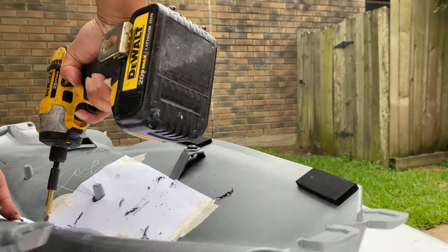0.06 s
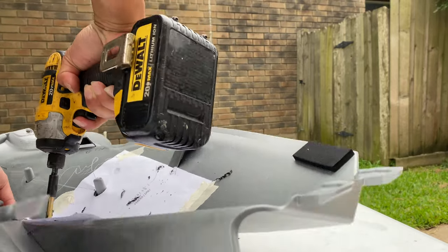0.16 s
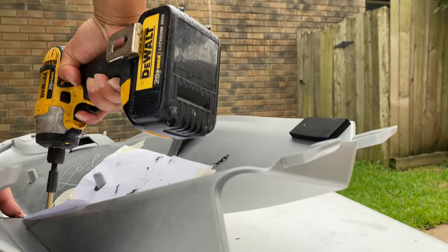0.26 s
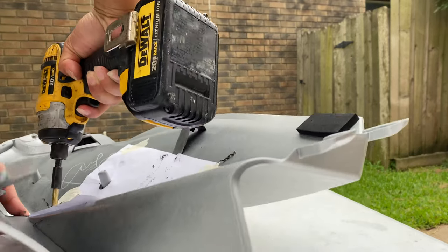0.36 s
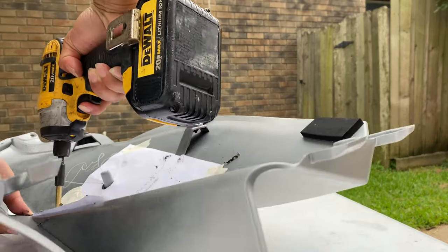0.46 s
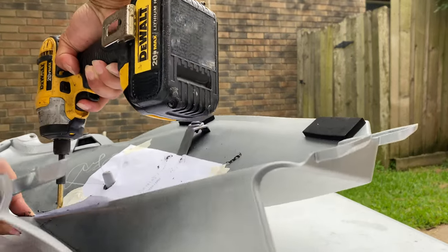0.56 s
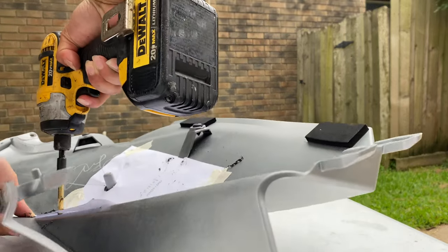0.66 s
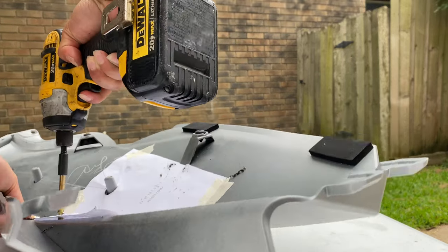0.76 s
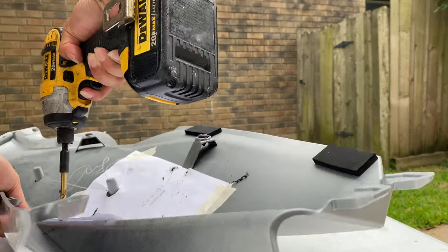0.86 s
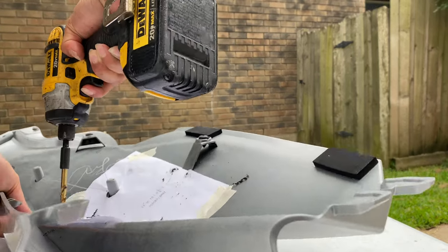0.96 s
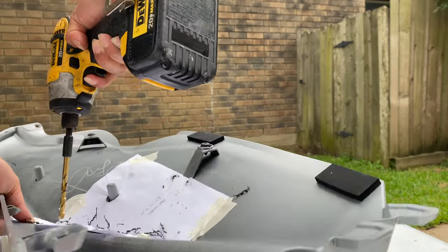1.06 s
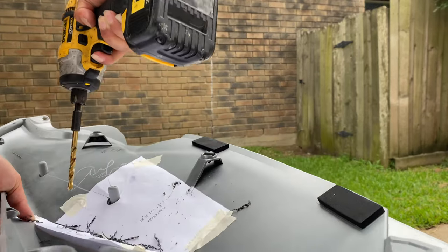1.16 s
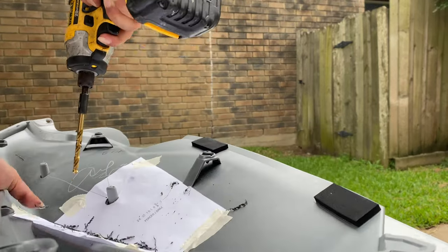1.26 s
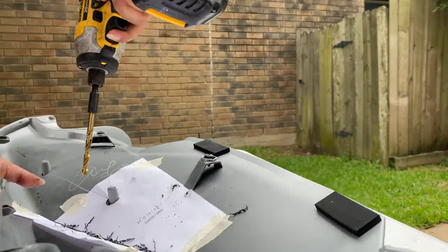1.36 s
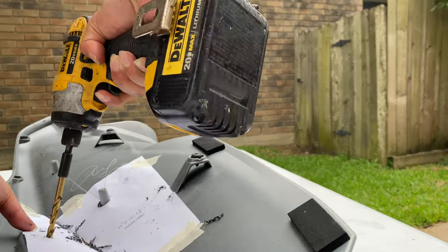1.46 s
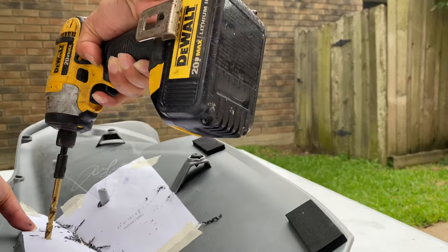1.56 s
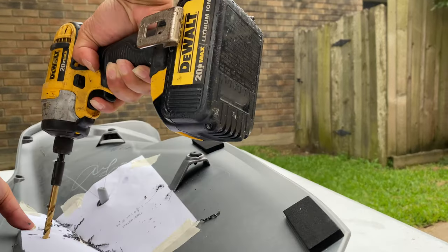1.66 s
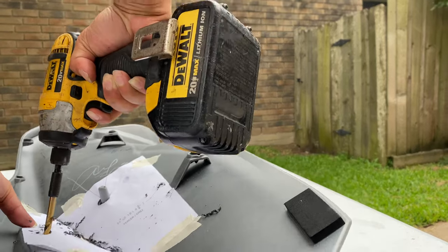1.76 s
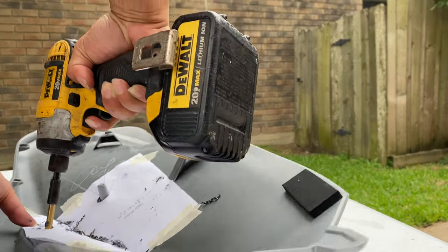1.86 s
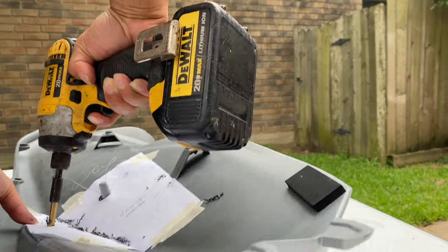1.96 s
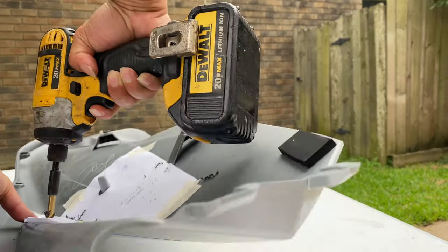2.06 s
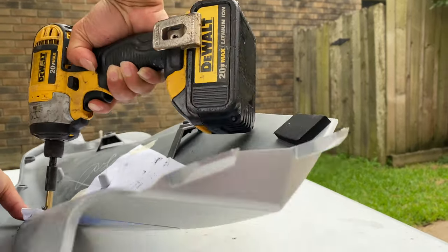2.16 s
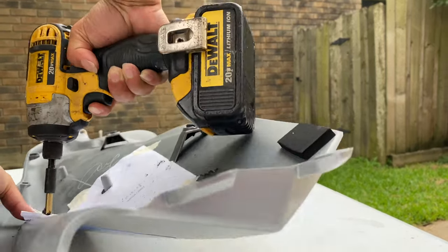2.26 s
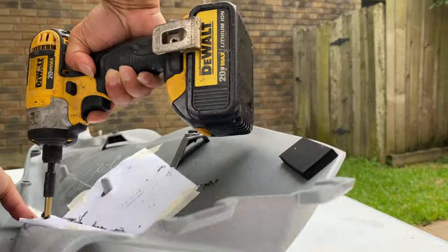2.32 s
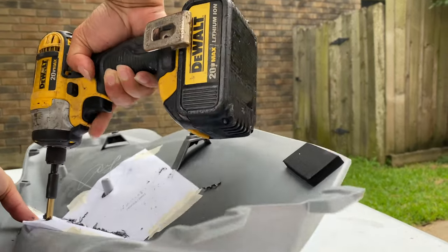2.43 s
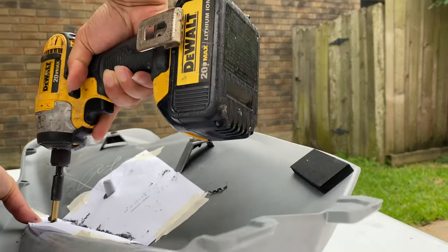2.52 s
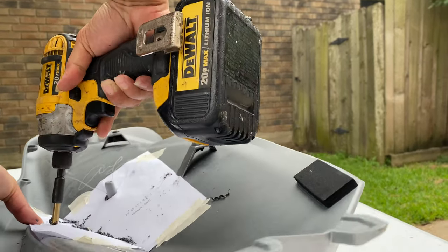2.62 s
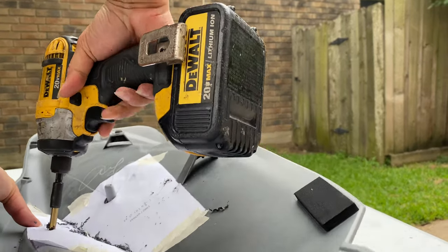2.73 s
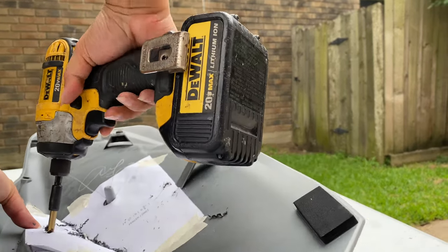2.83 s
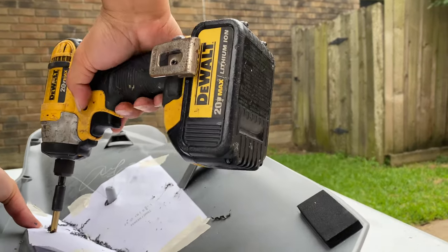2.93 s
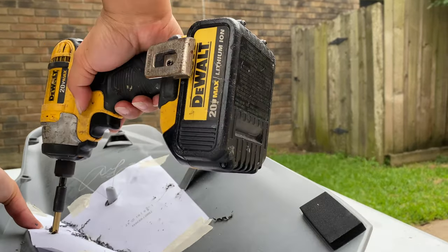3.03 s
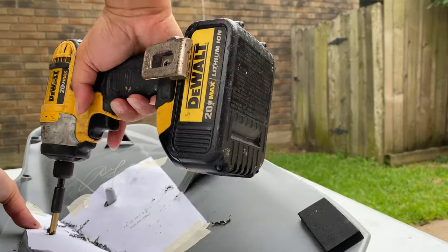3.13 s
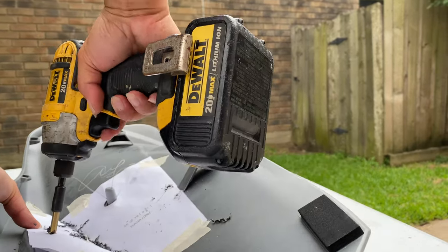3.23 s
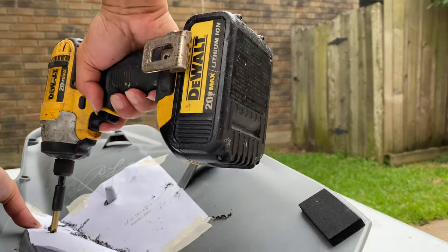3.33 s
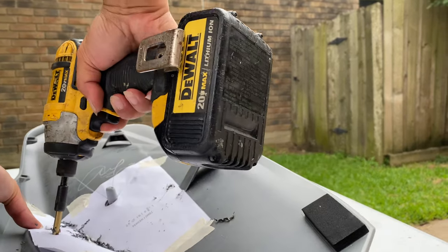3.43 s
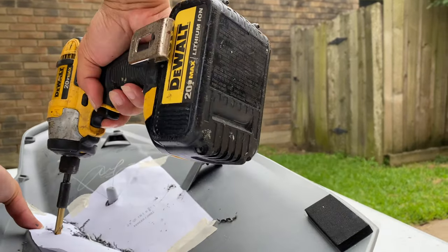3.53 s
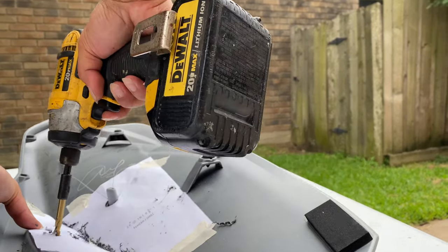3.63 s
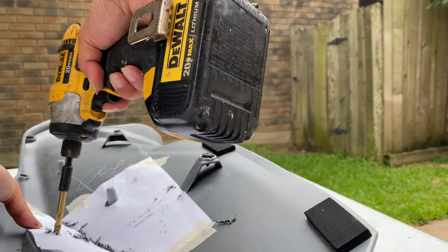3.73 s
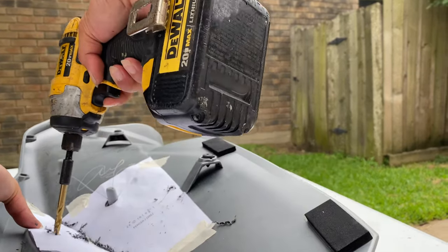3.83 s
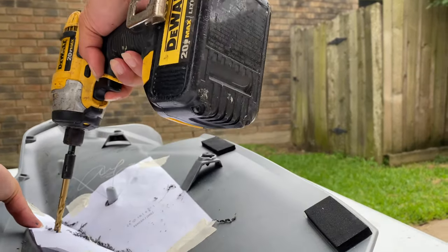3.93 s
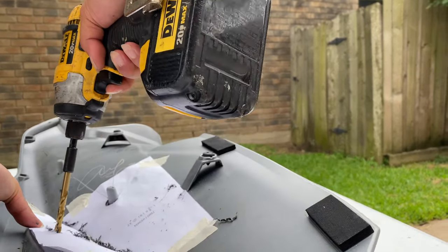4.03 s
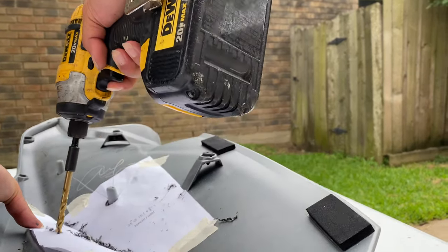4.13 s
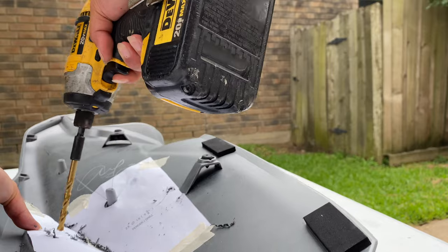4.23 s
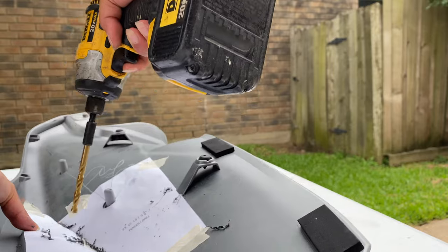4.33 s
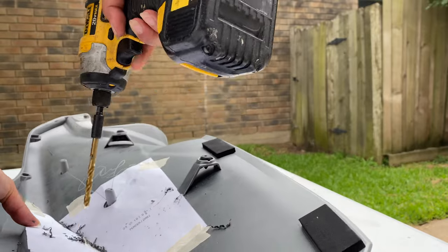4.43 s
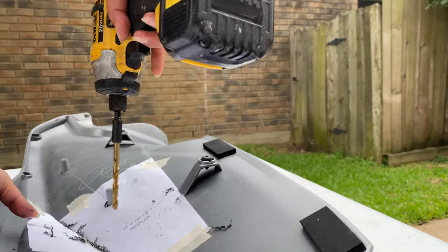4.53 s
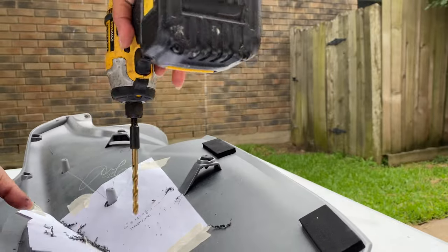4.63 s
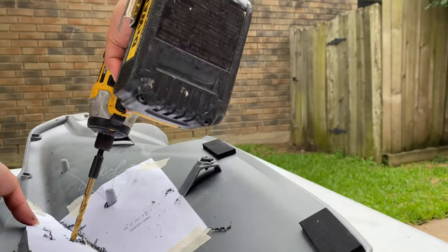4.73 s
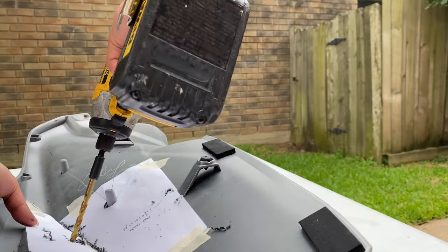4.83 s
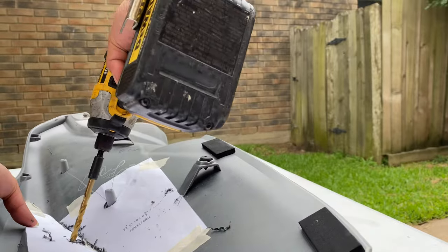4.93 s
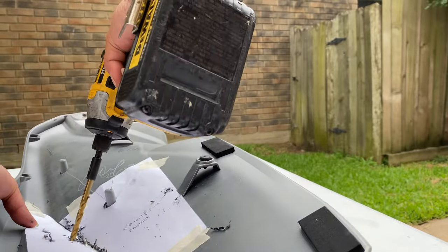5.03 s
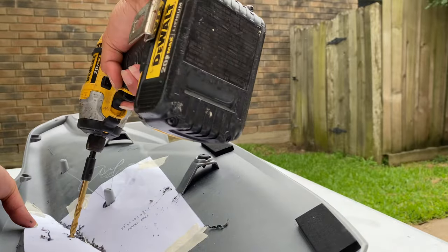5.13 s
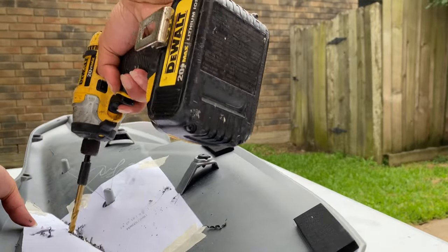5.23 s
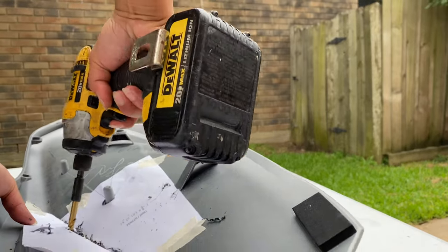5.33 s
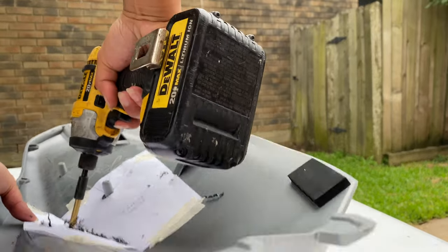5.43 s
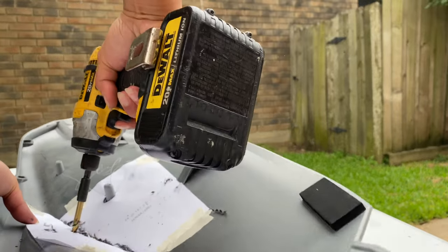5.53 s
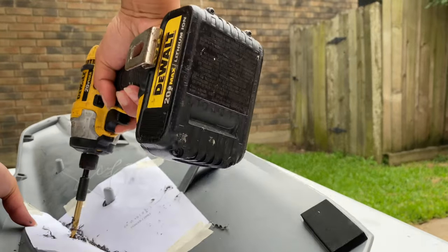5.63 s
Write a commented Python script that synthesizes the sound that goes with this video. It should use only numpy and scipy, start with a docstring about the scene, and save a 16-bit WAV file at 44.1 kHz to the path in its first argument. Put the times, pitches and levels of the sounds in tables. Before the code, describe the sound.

A cordless driver whines through plastic in five short bursts outdoors, with a high whistle, rattling gears, sharp metal clacks and dull knocks.

```python
"""A walled back yard: a cordless impact driver bores through a plastic panel in five short runs.
Its speed control whistles, its gears tick and rattle, the bit rubs once a turn, and the hammer
clacks when the bit grabs. The panel knocks as the tool is moved; a light wind buffets the microphone."""
import sys
import numpy as np
from scipy import signal
from scipy.fft import rfft, irfft, next_fast_len
from scipy.io import wavfile
from scipy.ndimage import uniform_filter1d

SR = 44100
rng = np.random.default_rng(int(sys.argv[2]) if len(sys.argv) > 2 else 0)


def unload_wav(signal):
    """Save mono or channel-first audio to the path in sys.argv[1] as 16-bit WAV at rate SR, clipped to [-1, 1]."""
    wavfile.write(
        sys.argv[1],
        SR,
        np.round(np.clip(np.atleast_2d(signal).T, -1, 1) * 32767).astype(np.int16),
    )


N = 250488
TIME = np.arange(N) / SR

# tool and panel resonances: centre_hz, width_hz, lift_db
BODY_MODES = [(850, 30, 3.5), (1414, 22, 4), (1595, 110, 3), (1843, 98, 5.5), (2315, 45, 1),
              (3760, 230, 1.5), (4220, 45, 2), (4330, 230, 2), (4970, 1400, 4.5), (5884, 80, -2),
              (6550, 180, -2.5), (6420, 45, 5)]


def from_db(db):
    return 10 ** (np.asarray(db) / 20)


def unit_rms(x):
    return x / np.sqrt(np.mean(x ** 2) + 1e-20)


def butter(x, hz, kind="low", order=2):
    return signal.sosfilt(signal.butter(order, hz, kind, fs=SR, output="sos"), x + 1e-18)


def drift(cutoff_hz):
    """Low-passed random wander, unit RMS."""
    return unit_rms(butter(rng.standard_normal(N + SR), cutoff_hz)[SR:])


def colour(x, spectrum, modes=()):
    """Minimum-phase filter of unit power: a smooth spectrum plus resonances."""
    size = next_fast_len(N + SR // 4, True) // 2 * 2
    hz = np.maximum(np.arange(size // 2 + 1) * SR / size, 1)
    point_hz, point_db = np.transpose(spectrum)
    rolloff_db = 20 * np.log10(np.maximum(point_hz[0] / hz, 1) * np.maximum(hz / point_hz[-1], 1))
    db = np.interp(np.log(hz), np.log(point_hz), point_db) - rolloff_db
    for centre_hz, width_hz, lift_db in modes:
        db += lift_db / (1 + (2 * (hz - centre_hz) / width_hz) ** 2)
    cepstrum = irfft(np.log(unit_rms(from_db(db))))
    cepstrum[1:size // 2] *= 2
    cepstrum[size // 2 + 1:] = 0
    return irfft(rfft(x, size) * np.exp(rfft(cepstrum)))[:N]


def noise(spectrum):
    return colour(rng.standard_normal(N), spectrum)


def contacts(starts_s, levels_db, t60s_s, rise_s=.0009, tail_db=-25, tail_t60_s=.28):
    """Each contact: a dense, fast-dying crack and a faint diffuse tail that grows with its energy."""
    out = np.zeros(N)
    for start_s, level_db, t60_s in zip(starts_s, levels_db, t60s_s):
        at = int(start_s * SR)
        age_s = TIME[:min(SR // 2, N - at)]
        crack = np.minimum(age_s / rise_s, from_db(-60 * (age_s - rise_s) / t60_s))
        crack *= rng.choice([-1, 1], len(age_s))
        tail = from_db(tail_db - 60 * age_s / tail_t60_s) * min(t60_s / .03, np.sqrt(t60_s / .03))
        tail *= rng.standard_normal(len(age_s))
        out[at:at + len(age_s)] += from_db(level_db) * (crack + tail)
    return out


def ticks(cycles, spread_db):
    """One click of random strength per cycle, split between two samples; unit RMS."""
    at = np.flatnonzero(np.diff(np.floor(cycles)) > 0)
    step = cycles[at + 1] - cycles[at]
    late = (np.ceil(cycles[at]) - cycles[at]) / step
    size = from_db(spread_db * rng.standard_normal(len(at))) / np.sqrt(step)
    out = np.zeros(N)
    out[at], out[at + 1] = size * (1 - late), size * late
    return unit_rms(out)


def yard(air_db=-63.5, hum_hz=239, hum_db=-72):
    """Quiet outdoor noise with a far hum."""
    air_spectrum = [(100, -12.5), (165, -16), (375, -14), (800, -17.5), (1800, -19), (5000, -19.5),
                    (6800, -29), (15000, -42)]  # freq_hz, density_db
    hum = from_db(hum_db + 2 * drift(6)) * np.sqrt(2) * np.sin(2 * np.pi * hum_hz * TIME)
    return hum + from_db(air_db) * noise(air_spectrum)


def wind(breeze_db=-50.5, rise_s=.044, fall_s=.075):
    """Puffs swell and die on the microphone over a steady breeze."""
    puffs = [(.22, -43), (0.779, -44.5), (1.209, -30), (1.4, -33.5), (1.681, -34.5), (1.9, -26),
             (2.271, -31.5), (2.92, -34.5), (3.66, -40), (3.8, -36.5), (4.43, -45), (5.08, -37.5),
             (5.32, -24.5), (5.5, -28)]  # peak_s, level_db
    buffet_spectrum = [(15, -5), (28, -1), (42, 3), (70, 1.5), (100, -13), (160, -23), (300, -38),
                       (700, -48.5)]  # freq_hz, density_db
    swell = sum(from_db(level_db) * np.exp(-np.maximum((peak_s - TIME) / rise_s, (TIME - peak_s) / fall_s))
                for peak_s, level_db in puffs)
    return np.hypot(from_db(breeze_db), swell) * noise(buffet_spectrum)


def yard_echo(x, t60_s=.15, wet_db=-19, cutoff_hz=6000):
    """Wall and fence scatter a short, dull tail."""
    age_s = TIME[:SR // 2]
    envelope = from_db(-60 * age_s / t60_s) * (1 - np.exp(-age_s / .005))
    tail = butter(rng.standard_normal(len(age_s)) * envelope, cutoff_hz, order=1)
    return from_db(wet_db) * signal.fftconvolve(x, tail / np.sqrt(2 * np.sum(tail ** 2)))[:N]


def bit_slide(start_s=1.199, end_s=1.51, ramp_s=.086, level_db=-48, fade_db_per_s=38):
    """The flutes scrape the rim of the first hole, ever more lightly as the bit comes out."""
    scrape_spectrum = [(800, -6), (2000, -0.5), (4000, 2), (6200, 4), (8000, -12), (15000, -24)]  # freq_hz, density_db
    age_s = np.maximum(TIME - start_s, 0)
    contact = np.clip(np.minimum(age_s, end_s - TIME) / ramp_s, 0, 1)
    return contact * from_db(level_db - fade_db_per_s * age_s + 2.1 * drift(96)) * noise(scrape_spectrum)


def panel_knocks():
    """Dull taps on panel and grip set the hollow plastic flexing."""
    taps = [(0.175, -35.5, -1.5, 0.16), (1.163, -33, 5.5, 0.099), (1.762, -33.5, -15, 0.22),
            (1.837, -29, -10.5, .09), (1.889, -23.5, -5, 0.051), (2.098, -38, 7, 0.066),
            (2.136, -32, -9, 0.095), (2.159, -40.5, -11, 0.081), (2.506, -49.5, -18, .025),
            (2.521, -47.5, -18, 0.029), (2.748, -29, -9, 0.03), (2.84, -40.5, -7, 0.042),
            (3.032, -41.5, -11, .036), (3.188, -52.5, -15, 0.023), (4.383, -39.5, 4, 0.065),
            (4.514, -51, -15, 0.032), (4.717, -48, -14, 0.016), (5.252, -34, 1.5, 0.32),
            (5.327, -32, 2, 0.08), (5.653, -37.5, -0.5, 0.023)]  # start_s, level_db, thump_offset_db, t60_s
    tap_spectrum = [(120, -2.5), (400, 4.5), (800, 0), (1100, 1.5), (1500, 4), (2200, 3), (3000, -9),
                    (4700, -2.5), (7000, -24.5), (14000, -41)]  # freq_hz, density_db
    hollow_modes = [(837, 60, 7.5), (1394, 50, 5.5), (1663, 50, 7), (2277, 70, 4)]  # centre_hz, width_hz, lift_db
    flex_modes = [(75, -5.5, 0.096), (167, -6.5, 0.067), (248, -15, 0.14), (405, -10.5, 0.081)]  # pitch_hz, level_db, t60_s
    start_s, level_db, thump_offset_db, t60_s = np.transpose(taps)
    push = np.zeros(N)
    push[(start_s * SR).astype(int)] = from_db(level_db + thump_offset_db)
    age_s = TIME[:SR // 2]
    flex = sum(from_db(db - 60 * age_s / ring_s) * np.sin(2 * np.pi * hz * age_s)
               for hz, db, ring_s in flex_modes)
    thumps = signal.fftconvolve(push, flex)[:N]
    return colour(contacts(start_s, level_db, t60_s), tap_spectrum, hollow_modes) + thumps


def binding(rub_s=.034):
    """How hard the bit binds in its hole: flat-topped swells, at most one a turn."""
    rubs = [(.073, -31.5), (0.282, -36.5), (.36, -35), (.451, -34), (.529, -35.5), (.612, -36.5),
            (.697, -39), (.766, -33.5), (0.833, -36), (1.75, -32), (2.226, -42), (5.012, -31.5),
            (5.062, -32.5), (5.141, -33), (5.246, -34), (5.312, -30.5), (5.526, -33), (5.58, -34.5)]  # centre_s, level_db
    return sum(from_db(level_db) * np.exp(-np.minimum((2 * (TIME - centre_s) / rub_s) ** 4, 50))
               for centre_s, level_db in rubs)


def gear_rate(bind, sag=.8):
    """Gear ticks per second: zero between runs, sagging a little when the bit binds."""
    # speed curve of each run: time_s, tick_hz
    first_hole = [(0, 380), (.06, 360), (.2, 277), (.38, 316), (.445, 306), (.53, 317), (.7, 367),
                  (.93, 324), (1.13, 238), (1.22, 33)]
    jammed_run = [(1.458, 92), (1.601, 125.7), (1.669, 262), (1.74, 302), (1.86, 200), (1.949, 117.3),
                  (2.05, 33), (2.15, 40), (2.24, 10)]
    second_hole = [(3.265, 69.98), (3.38, 131.4), (3.55, 451), (3.62, 530), (3.7, 560), (3.8, 437),
                   (3.95, 180), (4.02, 15)]
    clearing_run = [(4.026, 65), (4.07, 100), (4.12, 336.5), (4.17, 436.5), (4.24, 507), (4.32, 420),
                    (4.36, 0)]
    third_hole = [(4.79, 29.5), (4.87, 150), (4.93, 410), (5, 450), (5.19, 292), (5.25, 378), (5.4, 458),
                  (5.52, 537), (5.6, 470.5), (5.655, 0)]
    curves = first_hole, jammed_run, second_hole, clearing_run, third_hole
    tick_hz = np.max([np.interp(TIME, *np.transpose(curve), left=0, right=0) for curve in curves], axis=0)
    return tick_hz * (1 - sag * bind) * (1 + .006 * drift(25))


def drive_gains(tick_hz, bind, working_hz=340, coast_loss_db=3.5, strain_db=-18.5, idle_current=.33):
    """Gains of gears, mesh, chips and whistle, from speed, trigger and load."""
    # trigger pulls: press_s, ease_s, release_s, load_rise_s, gear_db, chip_db, whistle_db, mesh_db
    runs = [(0, 0.82, 1.13, 0.00067, -38.5, -54.5, -36.5, -3),
            (1.452, 2.176, 2.256, 0.0037, -34.5, -54.5, -37.5, 1),
            (3.256, 3.644, 3.69, 0.039, -36.3, -52, -39.5, 0),
            (4.025, 4.187, 4.31, 0.062, -42, -58, -40.5, 1),
            (4.777, 5.499, 5.73, 0.29, -34.5, -52, -38.5, 1)]
    runs = np.array(runs)
    active_run = runs[np.searchsorted(runs[1:, 0], TIME)]
    press_s, ease_s, release_s, load_rise_s, gear_db, chip_db, whistle_db, mesh_db = active_run.T
    trigger = np.clip((release_s - TIME) / (release_s - ease_s), 0, 1)
    load = np.clip((TIME - press_s) / load_rise_s, 0, 1)
    pace = tick_hz / working_hz
    gear_gain = load * np.minimum(pace, 1) ** .66 * from_db(gear_db - coast_loss_db * (1 - trigger))
    gear_gain += from_db(strain_db) * bind
    chip_gain = load * pace ** .99 * from_db(chip_db)
    current = trigger ** 1.135 * np.minimum(pace, 1) ** .29 * (idle_current + (1 - idle_current) * load)
    return gear_gain, from_db(mesh_db), chip_gain, current * from_db(whistle_db)


def multipath(x):
    """Paths through housing, bit and panel come and go: partials swell and fade, power stays level."""
    paths = [(.0007, -4), (.0015, 1.5), (.0029, -6.5)]  # delay_s, level_db
    total = x + sum(from_db(level_db) * drift(14) * np.interp(TIME - delay_s, TIME, x, left=0)
                    for delay_s, level_db in paths)
    return total / np.sqrt(uniform_filter1d(total ** 2, SR // 25) + .05)


def bit_rub(cycles, bind):
    """The binding bit passes the gear ticks into a bright resonance."""
    rub_spectrum = [(900, -26), (1600, -10), (2800, -9.5), (4100, -7), (4700, 3), (5300, -0.5), (6100, -22),
                    (10000, -30.5)]  # freq_hz, density_db
    chatter = multipath(ticks(cycles, spread_db=1.8)) + .55 * rng.standard_normal(N)
    return colour(bind * chatter, rub_spectrum)


def motor(tick_hz, cycles, gain, turns_per_tick=1.19, hum_db=-13.5, octave_db=-7.5, max_gain_db=-42):
    """The rotor hums at its turning rate and whines as it spins freely."""
    whine_spectrum = [(500, -23.5), (1200, -7), (2500, 8), (3600, 13.5), (5200, -15), (6200, -25),
                      (8000, -7), (14000, -22)]  # freq_hz, density_db
    turns = turns_per_tick * cycles
    free_spin = np.clip((tick_hz - 380) / 120, 0, 1)
    whine = free_spin * colour(multipath(ticks(turns, spread_db=1.5)), whine_spectrum, BODY_MODES)
    hum = from_db(hum_db + 3.8 * drift(25)) * np.minimum(tick_hz / 480, 1) ** 3 * np.sin(2 * np.pi * turns)
    octave = free_spin * from_db(octave_db) * np.sin(4 * np.pi * turns)
    return np.minimum(gain, from_db(max_gain_db)) * (whine + hum + octave)


def control_whistle(gain, switch_hz=3901, overtones_db=(-27, -39, -42)):
    """The speed control chops the motor current at a fixed rate; the overtones waver."""
    phase = 2 * np.pi * switch_hz * TIME
    overtones = sum(from_db(db + 3 * drift(3.9)) * np.sin(k * phase)
                    for k, db in enumerate(overtones_db, 2))
    return np.sqrt(2) * (np.sin(phase) + overtones) * gain * from_db(1.6 * drift(25))


def gears_and_chips(tick_hz, cycles, gear_gain, mesh_gain, chip_gain, mesh_db=-1.5, rattle_db=-5.5):
    """Gears tick evenly under load and rattle loosely at speed; the cutting edge hisses."""
    # spectra: freq_hz, density_db
    tick_spectrum = [(250, -24), (600, -18), (1100, -7.5), (1650, 1.5), (2300, -5), (3000, 2), (4000, 1),
                     (5000, 3), (6000, -19), (9000, -41.5)]
    rattle_spectrum = [(200, -23.5), (500, -7), (950, -3.5), (1500, 3), (2300, 0.5), (3200, 4),
                       (4200, -4.5), (5000, -9), (6000, -3.5), (8000, -28.5), (11000, -34)]
    chip_spectrum = [(3000, -9), (6500, 8), (9000, -1.5), (12000, -4.5), (15000, -10.5)]
    mesh = colour(multipath(ticks(cycles, spread_db=3)), tick_spectrum, BODY_MODES)
    mesh *= from_db(mesh_db) * np.minimum(tick_hz / 170, 1)  # slow teeth meet softly
    gate = unit_rms(.36 + np.exp(-(cycles % 1) / .28))  # noise bunches behind each tick
    grains = rng.standard_normal(N) * gate * from_db(4 * drift(900))
    loose_db = 4 * np.clip((tick_hz - 330) / 200, 0, 1)
    rattle = colour(grains, rattle_spectrum, BODY_MODES) * from_db(rattle_db + loose_db)
    hiss = noise(chip_spectrum) * gate * from_db(3 * drift(400))
    return gear_gain * (mesh_gain * mesh + rattle) + chip_gain * hiss


def hammer_clacks(body_hz=2500, treble_hz=6800):
    """Steel strikes steel in hammer and chuck; the panel lends each blow more or less body."""
    blows = [(0.084, -19.5, -6, -24, .008), (0.1624, -4, -8, -18, 0.011), (0.1697, -2, -6, -3, 0.03),
             (.18, -14, -20, -3, 0.02), (0.6182, -26, -27, 8.5, 0.012), (1.464, -27.5, -2.5, -18, 0.019),
             (1.6253, -17.5, -4.5, -21, .04), (1.6275, -9.5, -6, -3, 0.0086),
             (1.787, -25, -4, -18.5, 0.0062), (1.8347, -15, -1.5, -9.5, 0.013),
             (1.878, -14.5, 8.5, -19, 0.028), (1.887, 4.5, 1.5, 5, .036), (1.8976, -9.5, -8, -7, 0.019),
             (1.9057, 1, 1, 3, 0.031), (2.2341, -15, 3.5, -4, 0.047), (2.404, -36, -6, -10, 0.056),
             (2.861, -40, 5, 5.5, 0.02), (2.8874, -15, -13, -5, 0.013), (2.8891, 2, -21.5, -10.5, 0.0098),
             (3.221, -40, -7, -5, 0.02), (3.276, -34, 0.5, -1, 0.027), (3.3512, -21, 11.5, 8, 0.039),
             (3.354, -17.5, 6, 12, 0.016), (4.309, -31, -2.5, -20, 0.035), (4.381, -33, 0, -22.5, 0.012),
             (4.749, -39.5, -9, -7, 0.019), (4.9005, -10, -3.5, -18.5, 0.018)]  # start_s, level_db, body_offset_db, treble_offset_db, steel_t60_s
    clack_spectrum = [(100, -30.5), (450, -6.5), (950, 0), (1400, 6.5), (2500, 2), (4000, 3), (5400, -2.5),
                      (7000, -7.5), (10000, -12.5), (15000, -22)]  # freq_hz, density_db
    start_s, level_db, body_offset_db, treble_offset_db, t60_s = np.transpose(blows)
    body = butter(contacts(start_s, level_db + body_offset_db - 3.5, 1.55 * t60_s), body_hz)
    steel = butter(contacts(start_s, level_db - 2.5, t60_s), [body_hz, treble_hz], "band")
    treble = butter(contacts(start_s, level_db + treble_offset_db + 1, .92 * t60_s), treble_hz, "high")
    return colour(body + steel + treble, clack_spectrum, BODY_MODES)


def scene():
    """The running tool and its echo, plus blows, knocks, wind and yard; mono."""
    bind = binding()
    tick_hz = gear_rate(bind)
    gear_gain, mesh_gain, chip_gain, whistle_gain = drive_gains(tick_hz, bind)
    backlash = .011 * drift(160) * np.minimum(tick_hz / 300, 1)  # gear play blurs the high partials
    cycles = np.cumsum(tick_hz) / SR + backlash
    tool = gears_and_chips(tick_hz, cycles, gear_gain, mesh_gain, chip_gain)
    tool += motor(tick_hz, cycles, gear_gain) + control_whistle(whistle_gain) + bit_rub(cycles, bind)
    return (tool + yard_echo(tool) + hammer_clacks() + panel_knocks() + bit_slide() + wind() + yard())[None]


def record(dry):
    """The loudest blows clip; a steep low-pass cuts the top."""
    ceiling, cutoff_hz = .85, 15800
    lowpass = signal.ellip(10, .1, 80, cutoff_hz, fs=SR, output="sos")
    return signal.sosfilt(lowpass, np.clip(dry, -ceiling, ceiling))


dry = scene()
out = record(dry)
unload_wav(out)
```